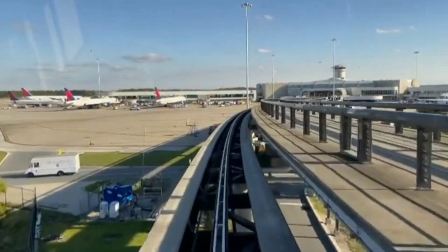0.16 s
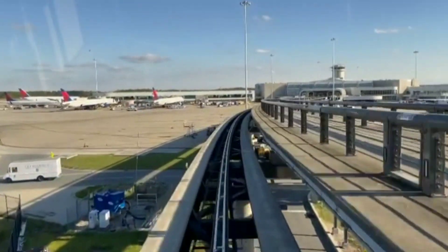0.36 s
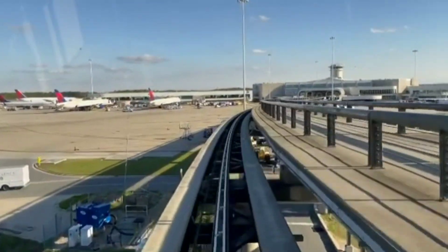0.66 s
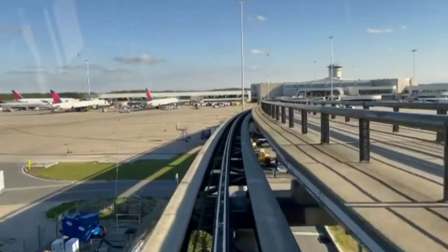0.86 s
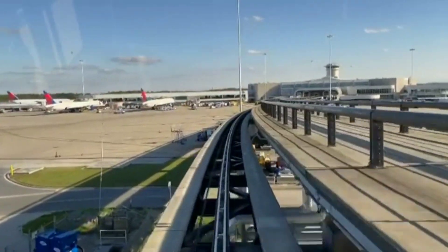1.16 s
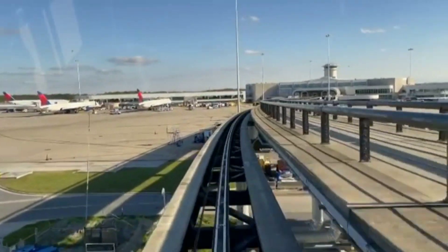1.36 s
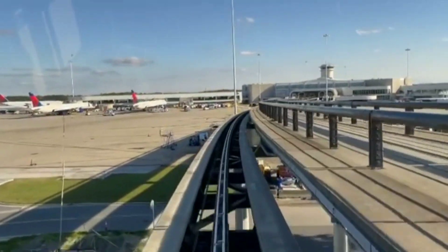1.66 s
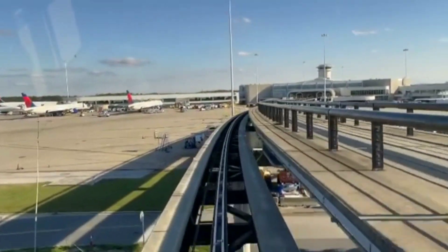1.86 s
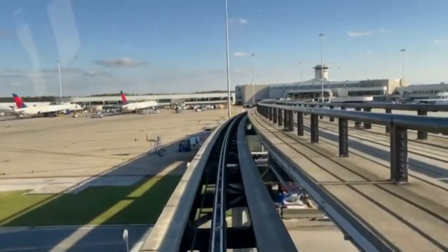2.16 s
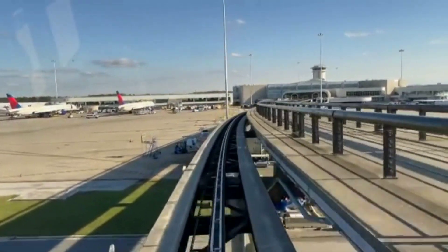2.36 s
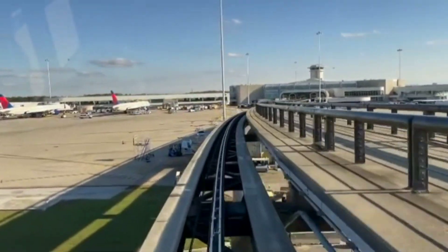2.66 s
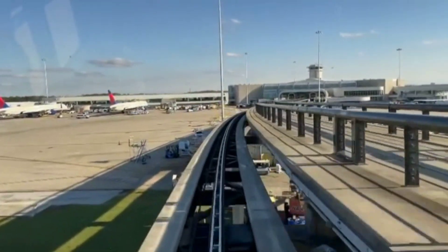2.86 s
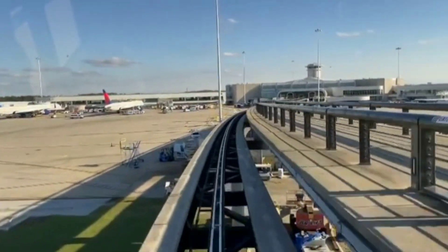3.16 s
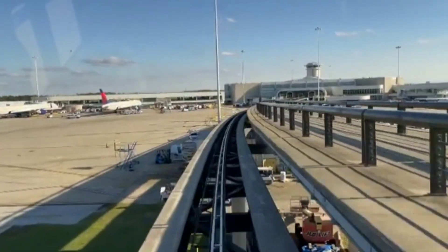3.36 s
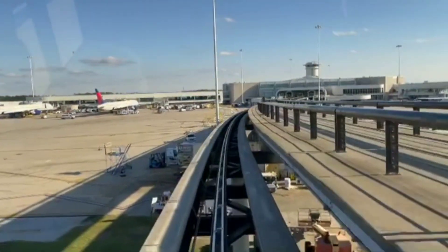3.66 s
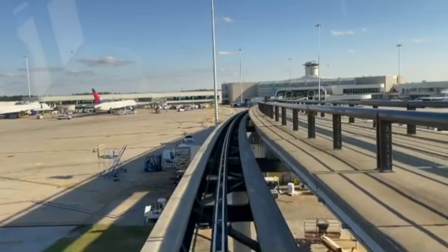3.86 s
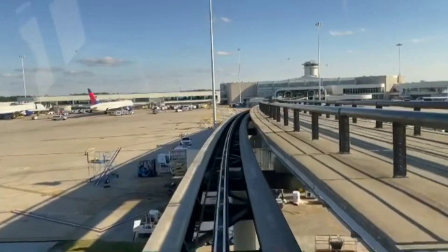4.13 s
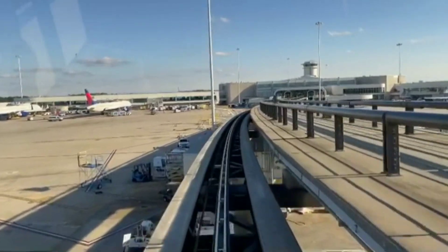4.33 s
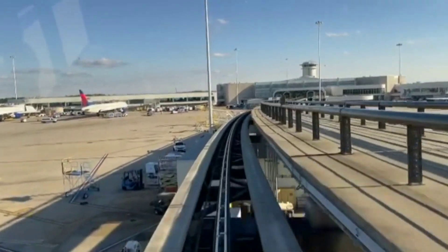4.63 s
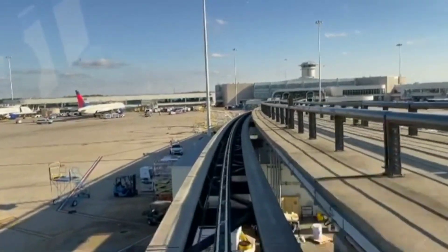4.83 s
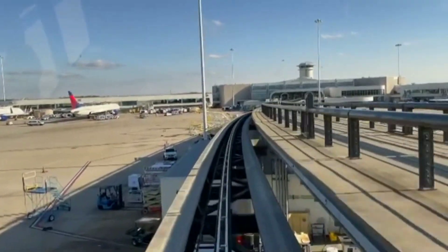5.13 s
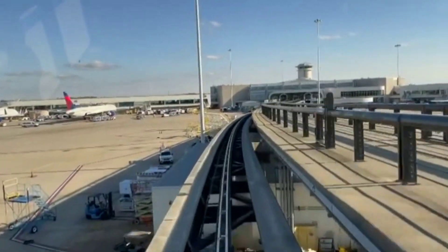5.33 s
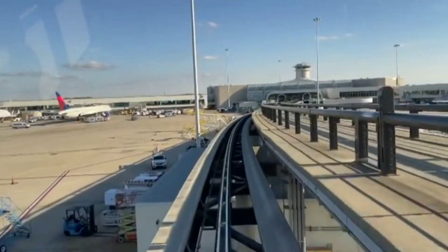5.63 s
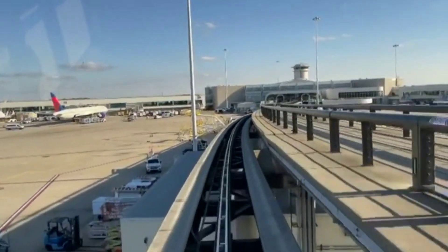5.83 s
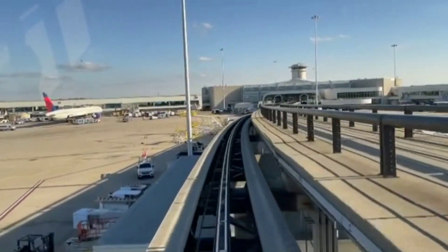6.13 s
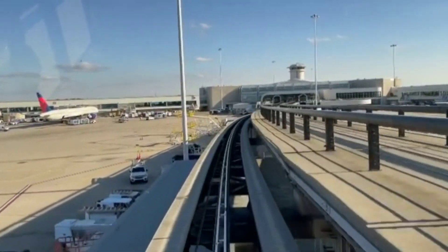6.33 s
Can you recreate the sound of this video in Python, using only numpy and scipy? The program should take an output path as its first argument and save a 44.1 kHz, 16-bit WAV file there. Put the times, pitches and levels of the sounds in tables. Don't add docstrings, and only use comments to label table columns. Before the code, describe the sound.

Heard from inside a closed rail car rolling at steady speed along a raised track. A very deep motor hum dominates, pulsing slightly, over soft tyre rumble. The floor booms dully at joints, panels shudder, trim rattles lightly. Small metal chinks and ticks cluster near half a second, again around two and a half and three and a half seconds. A faint whine grows later; the motion never stops.

```python
import sys
import numpy as np
from scipy import signal
from scipy.io import wavfile
from scipy.ndimage import uniform_filter1d, minimum_filter1d

SR = 44100
rng = np.random.default_rng(int(sys.argv[2]) if len(sys.argv) > 2 else 0)


def ratio(d):
    e = np.asarray(d, float) / 20
    return 10 ** e


def transcribe(u):
    v = np.clip(np.atleast_2d(u).T, -1, 1)
    q = np.round(v * 32767).astype(np.int16)
    wavfile.write(sys.argv[1], SR, q)


N = 286198
T = np.arange(N) / SR

# time in seconds, speed in Hz.
SHAFT_HZ = [(0, 55.0), (1.3, 54.95), (2.0, 54.75), (6.49, 54.72)]
# time in seconds, speed in Hz.
SECOND_SHAFT_HZ = [(0, 54.42), (1.0, 54.6), (4.2, 54.62), (6.49, 54.51)]
# time in seconds, level in dB.
HUM_DB = [(0, -14), (.9, -13), (1.6, -12), (2.7, -10.5), (3.6, -8.5), (4.6, -11.5), (5.6, -13),
          (6.49, -12.5)]
# time in seconds, depth in dB.
SAGS = [(0.161, -3), (0.24, -4), (0.579, -7), (0.697, -6), (0.811, -5), (1.061, -7), (1.292, -5),
        (1.655, -7), (1.764, -3.5), (2.074, -5.5), (2.272, -3), (2.536, -10), (2.968, -3.5), (3.249, -2.1),
        (3.858, -10), (3.961, -5.5), (4.33, -5.5), (4.588, -4), (5.243, -3), (5.763, -1.9), (5.923, -4.5),
        (6.026, -4), (6.279, -7), (6.399, -6)]
ORDER_NUMBERS = [(2, 0), (3, 0), (4, 1), (4.33, 1), (5, 1), (6.5, 1), (8, 1), (10, 1), (11, 0), (8, 0),
                 (14, 1), (18, 1), (20, 1), (22, 0), (11, 1), (6, 1)]
# left in dB, right in dB, left lead in rad, fuzz [0-1].
ORDER_MIX = [(-36, -35.5, .1, .2), (-44, -44, .1, .5), (-35.3, -37, .1, .12), (-44, -51, 0, .8),
             (-51, -48, .2, .3), (-48.5, -41.5, 2.5, .45), (-52, -44, .6, .2), (-41, -43, .3, .08),
             (-40.5, -50, 2.4, .15), (-54, -46, .6, .2), (-53, -59, 1.2, .5), (-56, -54.5, 2.9, .2),
             (-61, -56, -.3, .4), (-60, -60, 3, .4), (-45, -58, 2, .2), (-50, -57, -.5, .4)]
# time in seconds, load in dB.
LOAD_DB = [(0, -13.5), (1.3, -9.5), (2.2, -2.5), (2.9, -1), (3.3, 1), (4.4, 5.5), (5.0, -0.5), (5.6, 6),
           (6.49, 2.5)]
# frequency in Hz, centre and difference levels in dB per Hz.
RUMBLE_SPECTRUM = [(17.2, -65, -92), (38.5, -46.5, -77), (65.7, -35, -54.5), (83, -41, -59.5),
                   (129.7, -51, -59), (160, -54, -62), (230.5, -52.5, -65.5), (291, -57.5, -69),
                   (438, -56.5, -61.5), (510, -63.5, -59), (509, -60.5, -60), (575, -58.5, -67),
                   (631, -64, -65), (665, -62, -71.5), (722, -68, -63.5), (827, -69.5, -72),
                   (1130, -70.5, -70), (3017, -89.5, -92)]
# time in seconds, level in dB.
ROAD_DB = [(0, -23.5), (.8, -24.5), (2.0, -23.5), (2.9, -23), (3.35, -19.5), (4.0, -22), (5.2, -24.5),
           (5.5, -23), (6.49, -24.5)]
# frequency in Hz, centre and difference levels in dB per Hz.
TRIM_SPECTRUM = [(856, -100, -104), (2270, -85, -91), (3200, -88, -90), (4000, -88.5, -94),
                 (4800, -92.5, -92), (5600, -91, -93), (7200, -95.5, -95), (8500, -94, -102),
                 (9300, -97.5, -96), (10200, -100, -92), (11000, -93.5, -94), (11450, -95, -101),
                 (11700, -99, -110), (12070, -104, -110), (12500, -120, -124)]
# time in seconds, peak in dB, t60 in seconds, brightness in dB per octave.
JOLTS = [(.2394, -36.5, 0.21, 0), (.4499, -36, 0.38, -0.5), (0.5344, -33, 0.14, 0.5),
         (.7894, -38.5, 0.15, -0.5), (.885, -37.5, 0.25, -1.5), (.903, -36, 0.16, -3),
         (1.509, -34, 0.12, 0), (1.641, -37.5, 0.33, -0.5), (1.752, -39.5, .15, 0.5),
         (1.9894, -38, 0.24, 0), (2.0394, -35.5, 0.19, -2.5), (2.1494, -38, 0.15, -1.5),
         (2.282, -34, 0.21, -0.5), (2.384, -35, 0.35, 1), (2.4858, -35.5, 0.26, -3),
         (2.8963, -34.5, 0.36, -1), (2.9394, -40, .22, -4), (3.222, -35, 0.17, 1), (3.309, -36, 0.22, 0),
         (3.35, -37.5, 0.22, 2), (3.3894, -33, 0.33, 3), (3.432, -33.5, 0.48, 1.5), (3.478, -38, .15, -3.5),
         (3.508, -34.5, 0.57, -1.5), (3.528, -31.5, 0.17, 0), (3.8394, -35, 0.25, 0),
         (3.8856, -35, 0.21, 1.5), (4.1194, -40, 0.39, 2), (4.6269, -36, 0.23, -0.5),
         (4.684, -41.5, 0.3, 6), (4.708, -41, 0.2, 2), (4.8294, -41.5, 0.42, -4), (5.3667, -41.5, 0.46, 1),
         (5.6194, -41.5, 0.28, 4), (5.9194, -40, 0.26, 1.5), (6.3594, -43, 0.25, 9),
         (6.444, -36.5, 0.36, -2.5)]
# frequency in Hz, centre and difference levels in dB per Hz.
FLOOR_SPECTRUM = [(61, -124, -105), (103, -58.5, -76), (146.5, -52.5, -85), (160, -63.5, -84),
                  (211.4, -57.5, -59.5), (283, -67, -77.5), (322, -86, -87)]
# time in seconds, swell in dB [negative for a #
THUDS = [(.24, 4), (.4, 1), (.83, 9.5), (1.4, 7), (1.8, -2), (2.1, 3), (2.5, -4), (2.97, 4), (3.25, -8),
         (3.45, -18), (3.85, -8), (4.12, -4), (4.36, 3), (4.8, 4.5), (5.45, -3), (6.36, 3)]
# frequency in Hz,
# share in step [-1 to 1], share a quarter cycle ahead [-1 to 1].
PORTS = [(95, -.45, .2), (190, -.3, .28), (240, 0, 0), (310, 0, .05), (400, -.22, .3), (520, -.05, .3),
         (850, 0, .4), (1030, 0, .15), (1200, 0, .03), (1700, -.2, -.1), (2200, 0, .05), (2800, .05, .22),
         (4400, 0, .13), (5500, .08, 0), (7000, .12, .03), (7800, .04, .14), (9200, 0, -.12), (10200, 0, 0),
         (11000, -.03, .32), (11600, 0, 0)]
# time in seconds, pitch in Hz, level in dB, t60 in seconds.
PINGS = [(0.027, 4300, -47, 0.094), (.245, 3400, -54, .12), (2.31, 7050, -46, .15),
         (2.39, 9000, -51, 0.077), (2.495, 6900, -51, 0.12), (3.5, 3600, -53, 0.14),
         (2.755, 4300, -45, 0.12), (2.2, 4300, -49, 0.18), (2.898, 4890, -44, 0.17), (3.2, 7900, -49, 0.11),
         (6.4, 4300, -63, 0.18), (4.742, 4200, -54, .25), (4.629, 4020, -47, 0.09), (4.63, 6100, -50, 0.11),
         (4.634, 6200, -50.5, .1), (4.84, 5200, -56, 0.11), (1.7, 15000, -52, .08),
         (1.522, 11100, -54, .08), (5.6, 6400, -43, 0.093), (2.495, 15000, -54, .1), (0.37, 9300, -55, .06),
         (1.645, 4900, -47, 0.11), (1.65, 7750, -48, 0.13), (6.447, 4250, -51, 0.09)]
# centre in seconds, pitch in Hz, level in dB.
SHUDDERS = [(0.16, 138, -24), (0.16, 572, -33.5), (0.25, 759, -50), (0.37, 160, -25.5), (0.39, 670, -32.5),
            (0.48, 140, -28), (0.54, 754, -40), (0.83, 145, -19.5), (0.85, 204, -28), (1.07, 81, -17),
            (1.26, 203.5, -19), (2.35, 780, -41), (3.06, 273, -27), (3.28, 438, -23), (3.29, 334, -34),
            (3.29, 670, -34), (3.44, 770, -40), (3.45, 730, -46), (3.63, 750, -44), (3.77, 523, -40),
            (3.94, 475, -39), (3.97, 305, -31), (4.09, 414, -35), (4.23, 510, -39), (4.27, 624, -41),
            (4.28, 592, -27), (4.36, 134, -27), (4.74, 651, -40), (4.81, 700, -37), (4.87, 202, -20),
            (5.13, 355, -33), (5.41, 663, -38), (5.46, 707, -40), (5.53, 460, -35), (5.59, 594, -42),
            (5.65, 457, -41), (5.76, 442, -29), (6.09, 179, -24), (6.1, 322, -27.5), (6.1, 662, -44),
            (6.21, 690, -48), (6.46, 95, -17), (.17, 223, -26), (.52, 225, -30), (5.7, 166, -26),
            (5.95, 274, -31), (6.25, 275, -31), (.1, 264, -26), (2.38, 203, -34), (2.9, 115, -21),
            (3.85, 223, -22.5), (4.5, 154, -26), (5.42, 245, -25), (6.35, 214.4, -20.5), (1.02, 205, -29),
            (2.08, 110, -19), (1.75, 474, -35)]
# start in seconds, level in dB.
TICKS = [(.451, -47), (.5335, -38), (.5405, -41), (.547, -46), (.905, -44), (1.508, -36.5), (1.5145, -44),
         (1.519, -42), (1.531, -47), (1.642, -53), (2.282, -46), (2.298, -46), (2.385, -48), (2.486, -47),
         (2.898, -47), (3.225, -53), (3.3095, -43), (3.528, -45), (3.886, -47), (4.627, -42), (4.686, -44),
         (4.708, -45), (6.446, -45)]
# start in seconds, level on each of four modes in dB.
CHINKS = [(.459, -41, -52, -57, -54), (.466, -52, -48, -54, -62), (.474, -56, -39, -56, -62),
          (.906, -58, -52, -58, -62), (1.509, -52, -50, -48, -46), (1.518, -56, -56, -52, -46),
          (2.295, -45, -41, -52, -52), (2.304, -50, -42, -54, -60), (2.316, -50, -48, -56, -49),
          (2.333, -60, -58, -60, -51), (2.343, -60, -50, -60, -58), (2.380, -48, -52, -50, -44),
          (2.385, -37, -51, -50, -44), (2.391, -54, -48, -46, -37), (2.400, -42, -47, -47, -48),
          (2.408, -39, -50, -54, -50), (2.417, -50, -47, -50, -50), (2.435, -52, -50, -56, -58),
          (3.421, -50, -48, -58, -60), (3.430, -46, -43, -56, -56), (3.443, -54, -47, -56, -47),
          (3.481, -50, -46, -58, -64), (3.514, -54, -45, -45, -62), (3.528, -45, -43, -44, -60),
          (3.54, -52, -49, -52, -62), (2.299, -60, -60, -60, -45), (2.309, -60, -60, -60, -47),
          (3.448, -60, -49, -60, -60), (3.464, -60, -49, -60, -60), (6.445, -58, -50, -48, -58)]
# pitch in Hz, split in Hz, t60 in seconds.
FITTING_MODES = [(1800, 45, .07), (3590, 75, .07), (5400, 150, .07), (8400, 95, .09)]
# time in seconds, pitch [share of rest pitch].
FLEX = [(.46, 1.01), (.48, 1.003), (2.295, .98), (2.32, .992), (2.38, 1.02), (2.41, 1.008), (2.435, .95),
        (3.424, .982), (3.435, 1), (3.45, 1.03), (3.482, 1.055), (3.49, 1.055), (3.512, .96), (3.52, .97),
        (3.528, 1), (3.545, .96), (6.445, 1)]
FLEX_SHARE = [1, 1, .6, .2]
# frequency in Hz, level over step in dB, smallest step in dB.
BAND_STEPS = [(600, 45, -90), (1200, 20, -90), (2000, 4, -80), (3000, -6, -70), (5500, -6, -65),
              (7000, -5, -63), (9000, -5, -60), (11400, -3, -55), (12000, -2, -50), (12700, -3, -42)]


def evened(x):
    return x / np.sqrt(np.mean(abs(x) ** 2) + 1e-20)


def follow(rows):
    s, value = np.transpose(rows)
    return np.interp(T, s, value)


def relative(rows):
    db = follow(rows)
    return ratio(db - db.mean())


def bumps(rows, half_s):
    s, db = np.transpose(rows)[:, :, None]
    coarse_s = T[::64]
    bells_db = db * np.exp(-((coarse_s - s) / half_s) ** 2)
    return np.interp(T, coarse_s, bells_db.sum(0))


def drift(width_hz):
    hz = np.fft.fftfreq(4096, 64 / SR)
    z = rng.standard_normal(4096) + 1j * rng.standard_normal(4096)
    slow = evened(np.fft.ifft(z * np.exp(-(hz / width_hz) ** 2)))
    return np.interp(T, np.linspace(0, T[-1], 4096), slow)


def coloured(x, table, size, patchy_db, tilt_db=0.):
    overlap = size * 3 // 4
    hz, t, z = signal.stft(x, SR, nperseg=size, noverlap=overlap)
    log_hz = np.log(hz + 1)
    f, *levels = np.transpose(table)
    db = np.array([np.interp(log_hz, np.log(f), level, right=-150) for level in levels])[:, :, None]
    patches = rng.standard_normal(z.shape[1:][::-1]).T
    patches = uniform_filter1d(uniform_filter1d(patches, size=4, axis=0), size=20, axis=1)
    patches_db = patchy_db * np.clip(evened(patches), -3, 2)
    lean_db = np.log2((hz[:, None] + 1) / 5000) * np.interp(t, T, tilt_db * np.ones(N))
    z = z * ratio(db + patches_db + lean_db) * np.sqrt(SR / 2)
    f, along, ahead = np.transpose(PORTS)
    share = np.interp(log_hz, np.log(f), along + 1j * ahead)[:, None]
    copied = share * z[0] * ratio(db[1] - db[0])
    z = np.array([z[0], copied + np.sqrt(1 - abs(share) ** 2) * z[1]])
    mid, side = signal.istft(z, SR, nperseg=size, noverlap=overlap)[1][:, :N]
    return np.array([mid + side, mid - side])


def motor():
    turns = [2 * np.pi * np.cumsum(follow(speed)) / SR for speed in (SHAFT_HZ, SECOND_SHAFT_HZ)]
    wobble_rad = 0.25 * drift(width_hz=2.2).real
    hum = np.sqrt(2) * ratio(follow(HUM_DB) + bumps(SAGS, half_s=.025)) * np.sin(turns[0] + wobble_rad)
    load_db = follow(LOAD_DB)
    mesh_gain = ratio(.9 * load_db)
    high_gain = ratio(np.minimum(.6 * load_db + 4, 1.5))
    slack_gain = ratio(-.35 * load_db)
    whine = np.zeros((2, N))
    for (order, shaft), (left_db, right_db, lead_rad, fuzz) in zip(ORDER_NUMBERS, ORDER_MIX):
        waver = np.sqrt(1 - fuzz ** 2) + fuzz * drift(width_hz=1.2 + 0.31 * order)
        tone = np.exp(1j * order * turns[shaft]) * waver
        if order == 10:
            tone = tone * mesh_gain
        elif order > 7:
            tone = tone * high_gain
        elif order == 2:
            tone = tone * slack_gain
        left = ratio(left_db) * (tone * np.exp(1j * lead_rad)).real
        whine += np.sqrt(2) * np.array([left, ratio(right_db) * tone.real])
    return hum * ratio([[-.02], [.02]]) + whine


def rumble():
    noise = rng.standard_normal((2, N))
    return coloured(noise, RUMBLE_SPECTRUM, size=8192, patchy_db=1.5) * relative(ROAD_DB) ** 1.2


def trim():
    shake_db, rise_s, linger_db, linger_t60_s = -52, .0027, -14, 3
    s, peak_db, t60_s, bright_db = np.transpose(JOLTS)[:, :, None]
    coarse_s = T[::32]
    u = coarse_s - s
    after_s, before_s = np.maximum(u, 0), np.minimum(u, 0)
    decay = ratio(-60 * after_s / np.maximum(t60_s, .05)) ** 2
    decay += ratio(linger_db - 60 * after_s / linger_t60_s) ** 2
    swell = ratio(peak_db - 9.0) ** 2 * decay * np.exp(before_s / rise_s)
    steady = (ratio(shake_db) * relative(ROAD_DB)) ** 2
    power = steady + np.interp(T, coarse_s, swell.sum(0))
    lean_db = np.interp(T, coarse_s, (bright_db * swell).sum(0)) / power
    contacts = ratio(2.0 * uniform_filter1d(rng.exponential(1, N), size=40))
    grains = evened(rng.standard_normal((2, N)) * contacts)
    rattle = coloured(grains, TRIM_SPECTRUM, size=256, patchy_db=1.9, tilt_db=lean_db)
    return rattle * np.sqrt(power) * ratio(50.0)


def floor_panel():
    body = coloured(rng.standard_normal((2, N)), FLOOR_SPECTRUM, size=4096, patchy_db=1.5)
    rest_db = 3.5
    return body * ratio(rest_db + bumps(THUDS, half_s=.042))


def ring(hz, db, t60_s, split_hz):
    t = np.arange(SR // 5) / SR
    carrier = np.exp(2j * np.pi * (hz * t + rng.random()))
    beat = 1 + 0.45 * np.exp(-2j * np.pi * (split_hz * t + .2 * rng.random() - .2))
    blur = evened(uniform_filter1d(rng.standard_normal((2, len(t))), size=110, axis=1))
    blurred = carrier * beat * (1 + 0.19 * (blur[0] + 1j * blur[1]))
    return ratio(db - 60 * t / max(t60_s, .02)) * (1 - np.exp(-t / 0.00087)) * blurred.real


def pings():
    out = np.zeros(N + SR)
    for s, hz, db, t60_s in PINGS:
        out[round(s * SR):][:SR // 5] += ring(hz, db, t60_s, split_hz=220.0)
    return out[:N] * ratio([[.5], [-.5]])


def shudders():
    half_s, level_db = .04, -5
    out, u = np.zeros((2, N + SR)), np.arange(-SR // 5, SR // 5) / SR
    for (s, hz, db), (phase, side) in zip(SHUDDERS, rng.random((len(SHUDDERS), 2))):
        lead_rad = np.array([[1], [-1]]) * (2 * side - 1) * hz / 800
        swell = np.sqrt(2) * ratio(db + level_db) * np.exp(-(u / half_s) ** 2)
        tone = np.sin(2 * np.pi * (hz * u + phase) + lead_rad)
        out[:, round(s * SR):][:, :len(u)] += swell * tone
    return out[:, SR // 5:][:, :N]


def ticks():
    t60_s, band_hz = .035, [3100, 11300]
    out, t = np.zeros((2, N + SR)), np.arange(SR // 20) / SR
    for s, db in TICKS:
        shared, left, right = rng.standard_normal((3, len(t)))
        burst = shared + .5 * np.array([left, right])
        out[:, round(s * SR):][:, :len(t)] += ratio(db - 60 * t / t60_s) * burst
    bright = signal.butter(5, band_hz, "bandpass", fs=SR, output="sos")
    return signal.sosfilt(bright, out[:, :N])


def fitting():
    level_db, rise_s, beat = 4, .002, .15
    out, t = np.zeros(N), np.arange(SR // 5) / SR
    bend = follow(FLEX) - 1
    for k, (share, (hz, split_hz, t60_s)) in enumerate(zip(FLEX_SHARE, FITTING_MODES)):
        power = np.zeros(N + SR)
        for s, *blow_db in CHINKS:
            blow = ratio(blow_db[k] + level_db - 60 * t / t60_s) * (1 - np.exp(-t / rise_s))
            power[round(s * SR):][:len(t)] += blow ** 2
        turns = np.cumsum(hz * (1 + share * bend)) / SR
        pair = np.sin(2 * np.pi * turns) + beat * np.sin(2 * np.pi * (turns - split_hz * T))
        out += np.sqrt(power[:N]) * pair
    return out * ratio([[.5], [-.5]])


def scene():
    return motor() + rumble() + trim() + floor_panel() + pings() + shudders() + ticks() + fitting()


def limiter(x):
    limit_db, share, recover_db_per_s = -6, 0.75, 37.5
    level_db = 20 * np.log10(abs(x).max(0) + 1e-9)
    fall_db = recover_db_per_s * T
    peak_db = np.maximum.accumulate(level_db + fall_db) - fall_db
    over_db = np.maximum(peak_db - limit_db, 0)
    held_db = -minimum_filter1d(-over_db, size=441)
    return x / ratio(share * uniform_filter1d(held_db, size=441))


def coarse_spectrum(x, leak, clean_share, moody_db, drop_db):
    hop, bins, start, count = 1024, 640, 640, N // 1024 + 3
    n, k = np.arange(2 * hop)[:, None] + (1 + hop) / 2, np.arange(bins) + .5
    window = np.sin(np.pi * (n - hop / 2) / (2 * hop))
    basis = window * np.cos(np.pi / hop * n * k) * np.sqrt(2 / hop)
    pair = np.array([x[0] + x[1], x[0] - x[1]]) / 2
    pair = np.pad(pair, ((0, 0), (start, count * hop - N - start)))
    halves = pair.reshape(2, count, hop)
    c = np.concatenate([halves[:, :-1], halves[:, 1:]], axis=2) @ basis
    edges = np.r_[0:96:8, 96:144:12, 144, 160, 176, 196, 216, 240, 264, 292, 320:bins:32]
    widths = np.diff(np.r_[edges, bins])
    power = np.add.reduceat(c ** 2, edges, axis=2) / widths
    hz = (edges + widths / 2) * SR / (2 * hop)
    f, over_db, least_db = np.transpose(BAND_STEPS)
    joint = uniform_filter1d(uniform_filter1d(power.mean(0), size=3, axis=1), size=3, axis=0)
    joint = np.sqrt(abs(joint))
    mood_db = moody_db * evened(uniform_filter1d(rng.standard_normal(joint.shape), size=2, axis=0))
    step = np.maximum(joint * ratio(-np.interp(hz, f, over_db)), ratio(np.interp(hz, f, least_db)))
    step = step * ratio(mood_db) * ratio([[[0]], [[-1.5]]])
    kept = np.repeat(power > (step * ratio(drop_db)) ** 2, widths, axis=2)
    step = np.repeat(step, widths, axis=2)
    c = kept * np.sign(c) * np.floor(abs(c / step) ** (3 / 4) + .4) ** (4 / 3) * step
    around = uniform_filter1d(uniform_filter1d(c ** 2, size=3, axis=1), size=3, axis=2)
    around = np.sqrt(abs(around))
    smeared = (rng.random((count - 1, 1)) > clean_share) * np.clip((k - 30) / 60, 0, 1)
    frames = (c + leak * smeared * around * rng.standard_normal(c.shape)) @ basis.T
    out = np.zeros((2, count, hop))
    out[:, :-1] += frames[:, :, :hop]
    out[:, 1:] += frames[:, :, hop:]
    mid, side = out.reshape(2, -1)[:, start:start + N]
    return np.array([mid + side, mid - side])


def roll_off(x):
    return signal.sosfilt(signal.butter(12, 13090, fs=SR, output="sos"), x)


def record(dry):
    mix = coarse_spectrum(limiter(dry), leak=.11, clean_share=.17, moody_db=1.9, drop_db=-12)
    return roll_off(mix)


dry = scene()
out = record(dry)
transcribe(out)
```